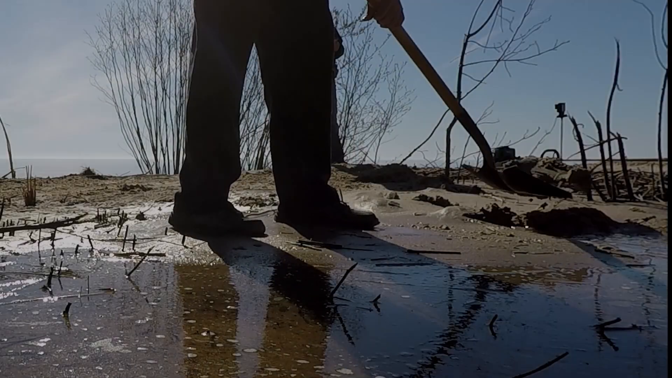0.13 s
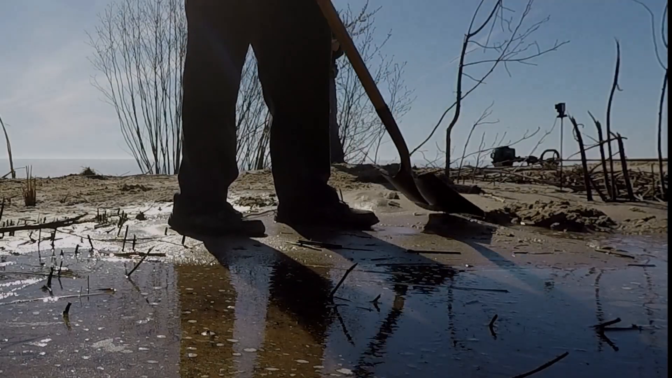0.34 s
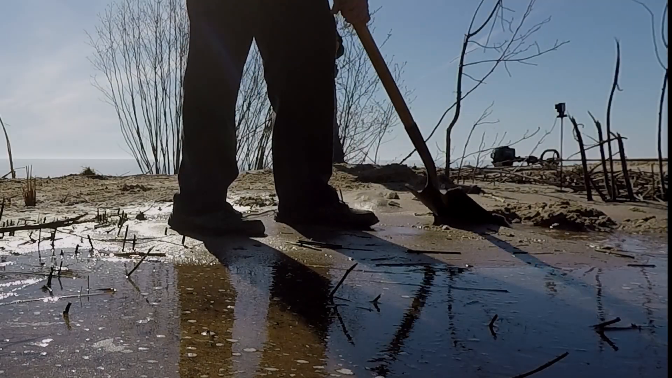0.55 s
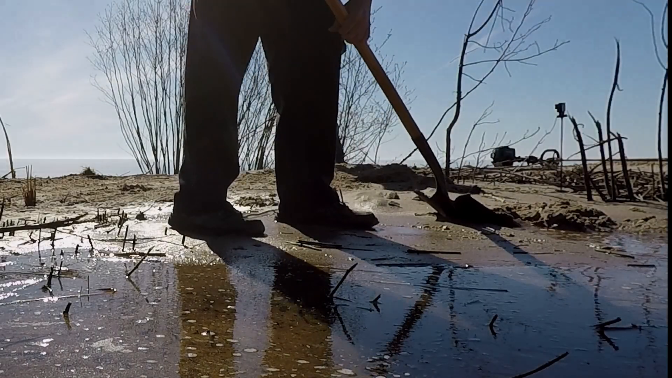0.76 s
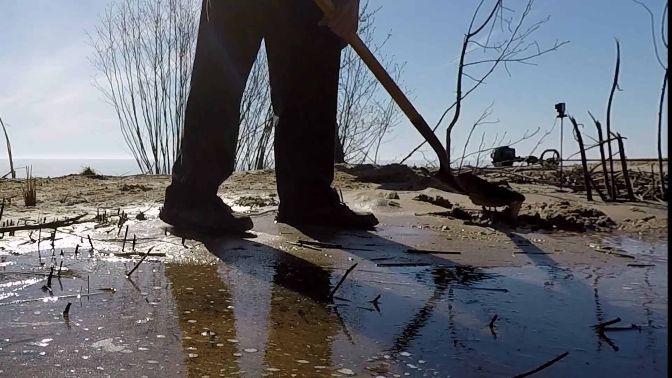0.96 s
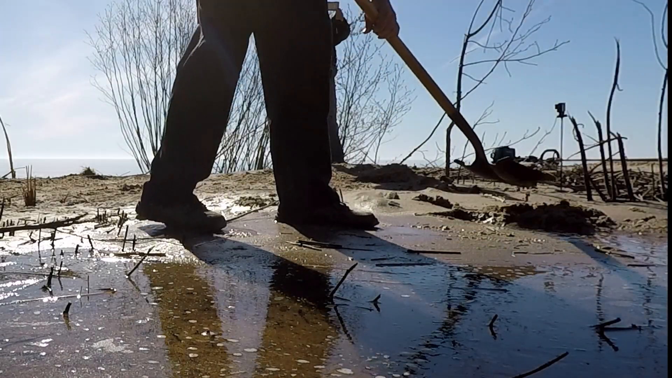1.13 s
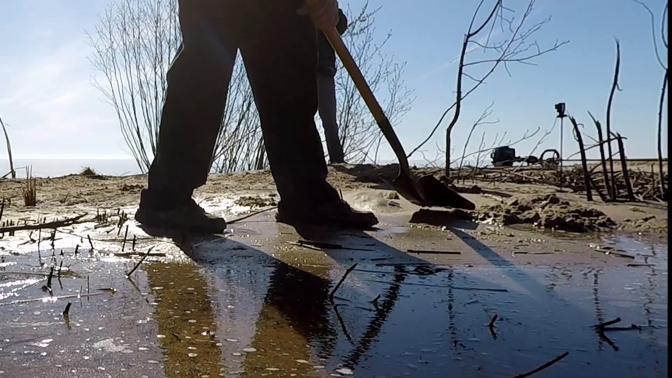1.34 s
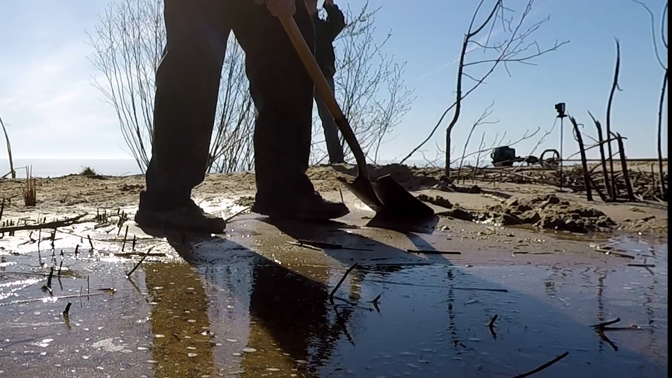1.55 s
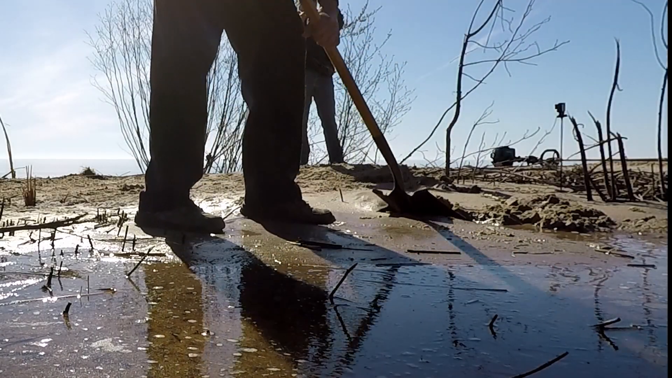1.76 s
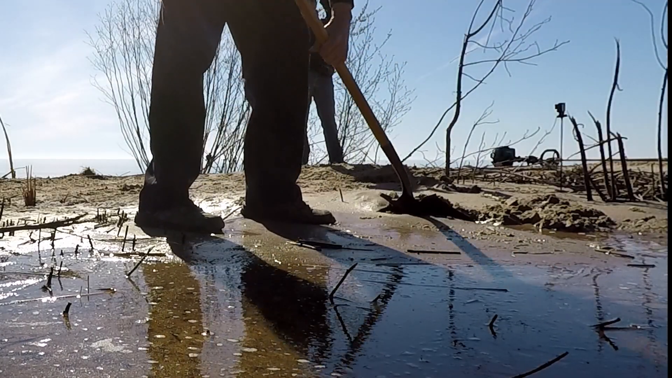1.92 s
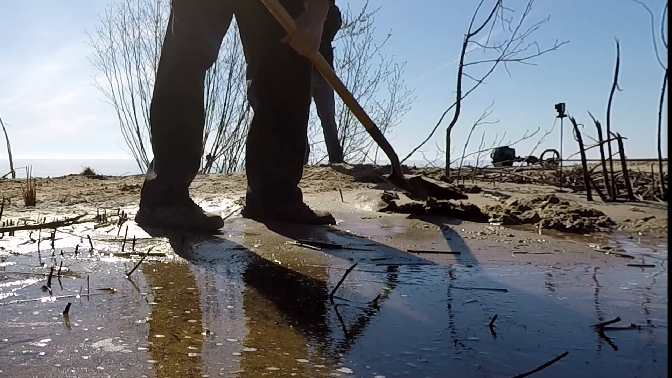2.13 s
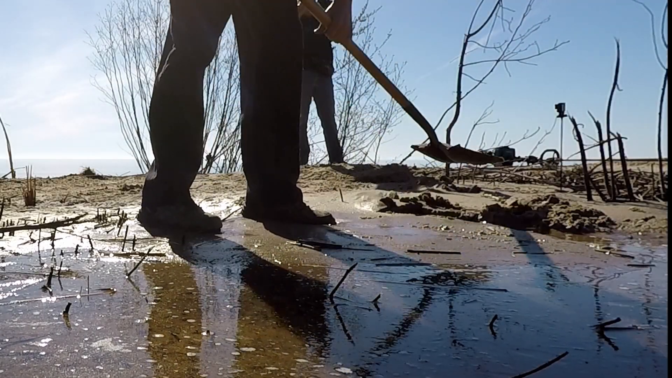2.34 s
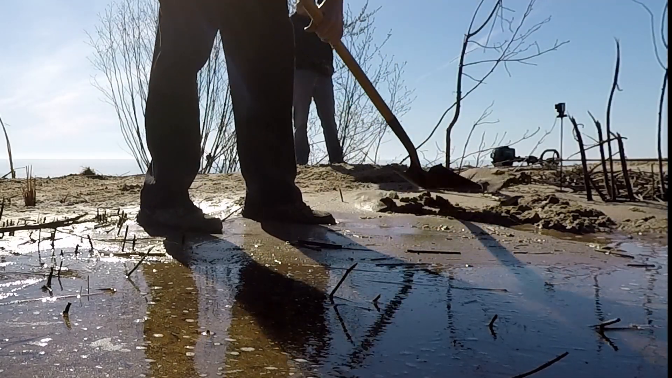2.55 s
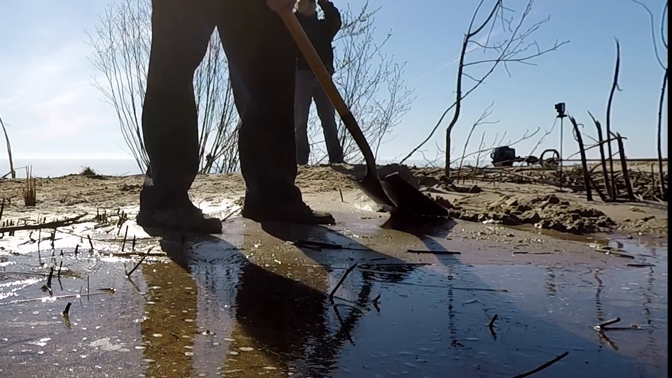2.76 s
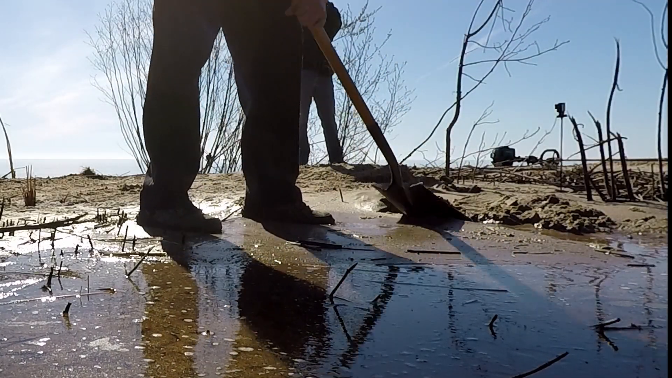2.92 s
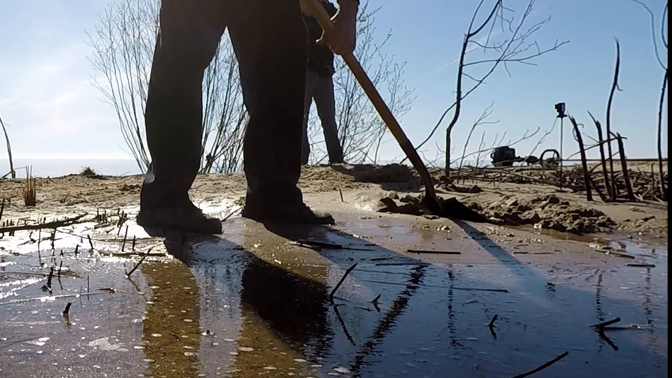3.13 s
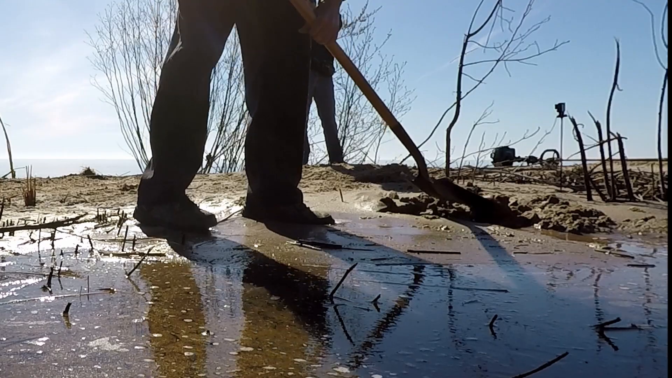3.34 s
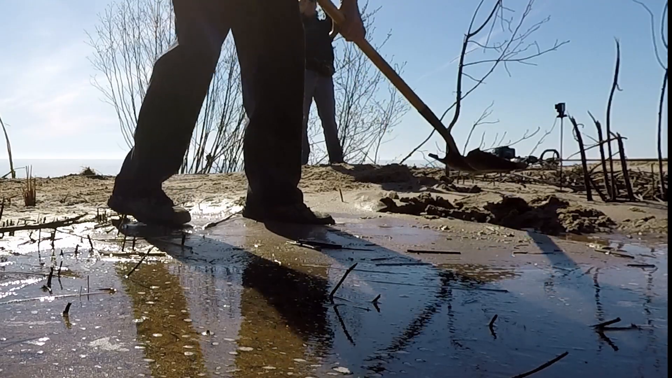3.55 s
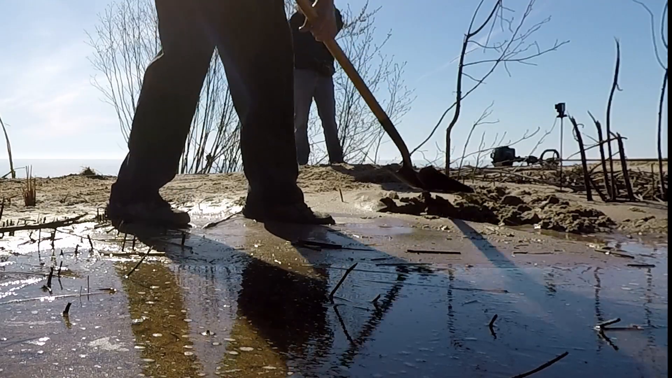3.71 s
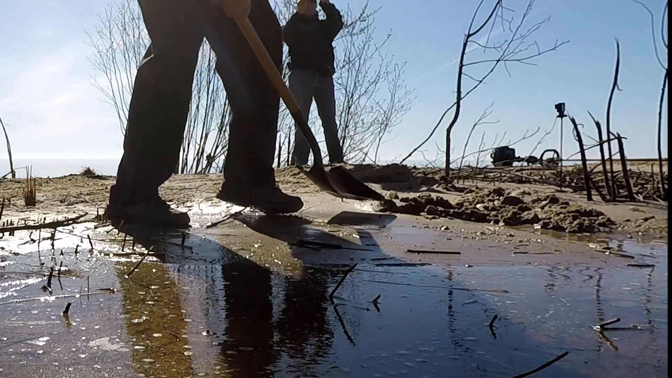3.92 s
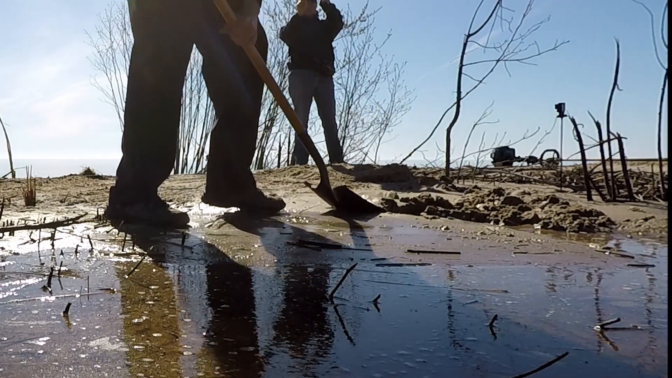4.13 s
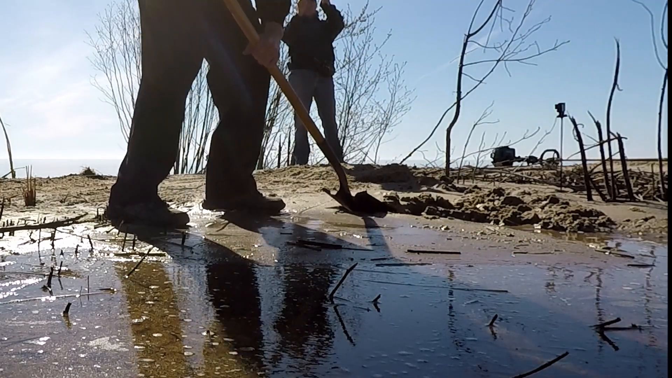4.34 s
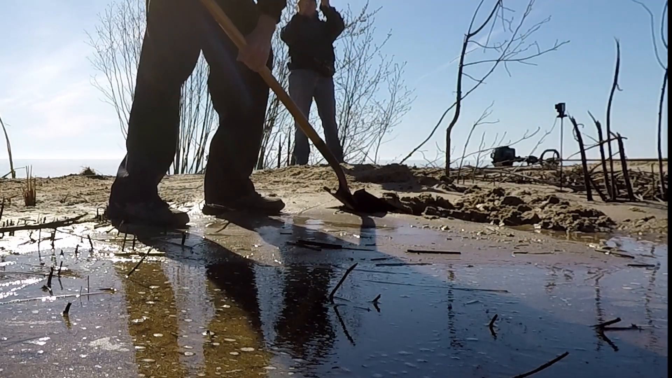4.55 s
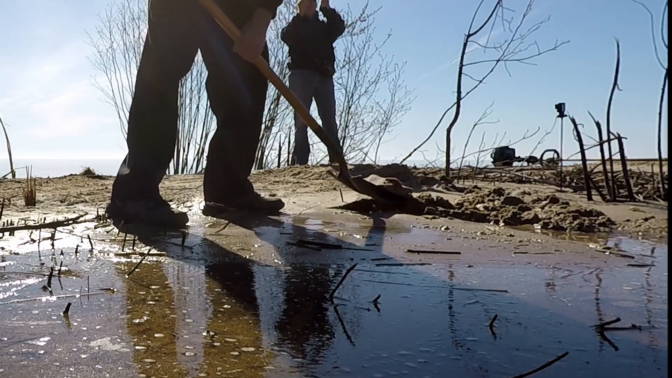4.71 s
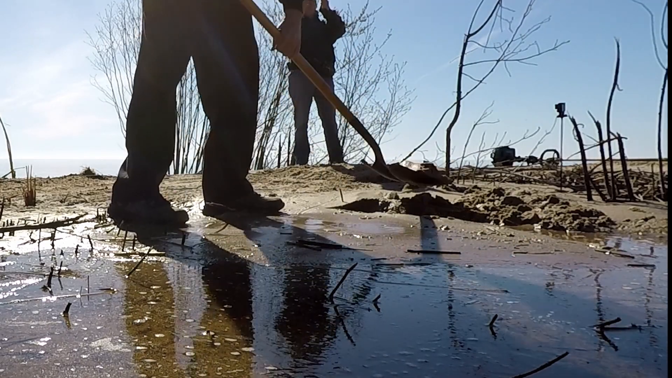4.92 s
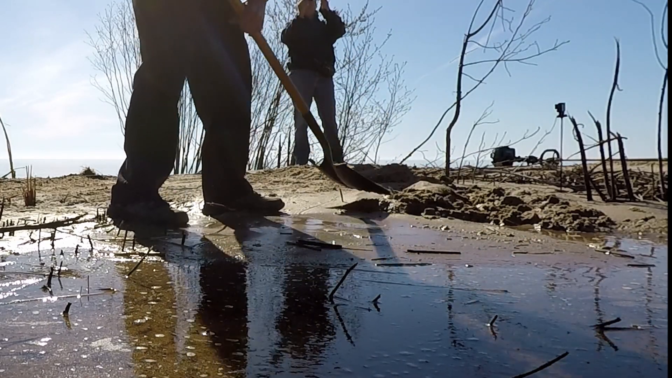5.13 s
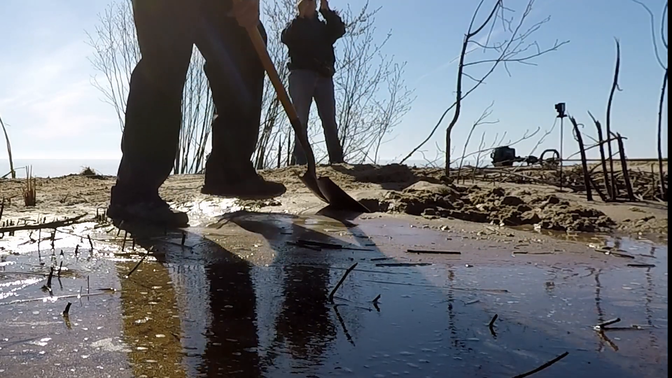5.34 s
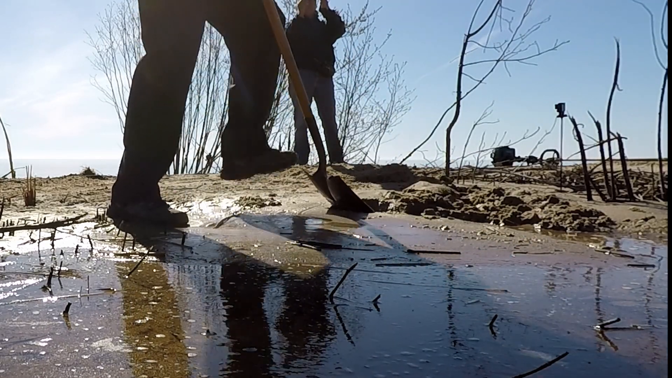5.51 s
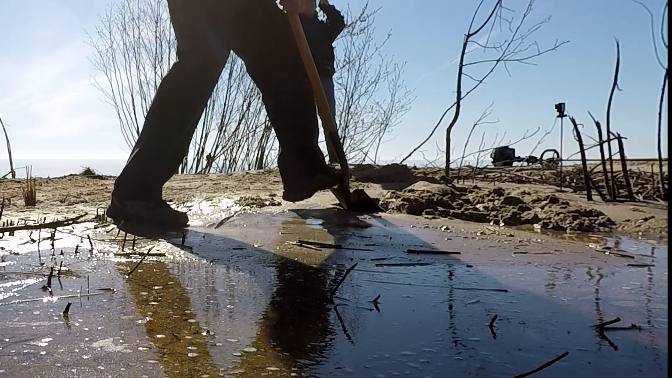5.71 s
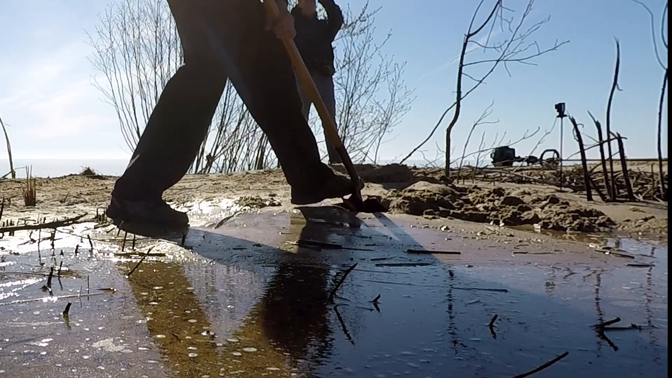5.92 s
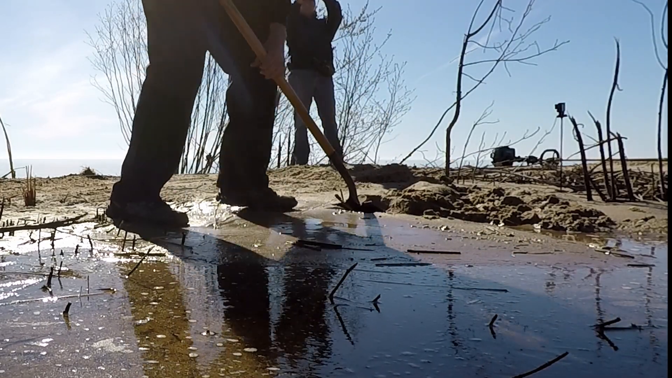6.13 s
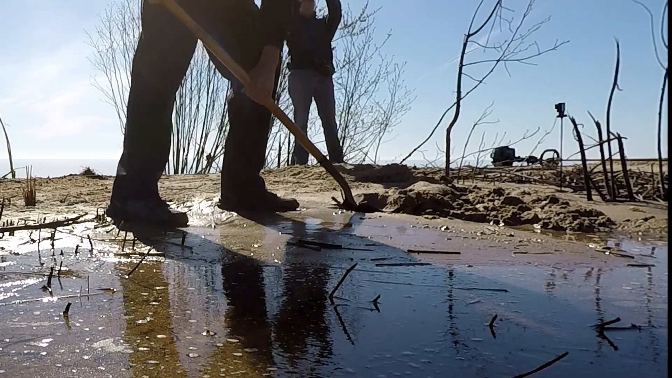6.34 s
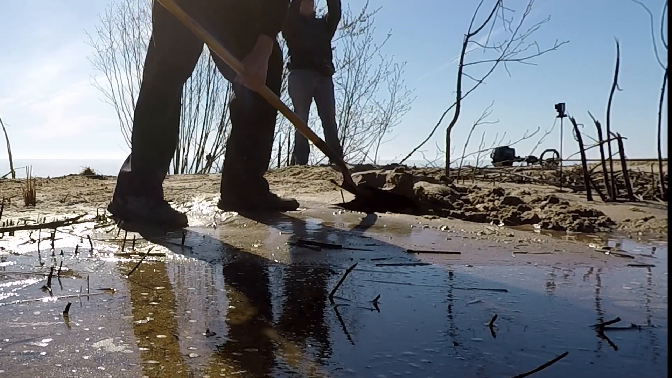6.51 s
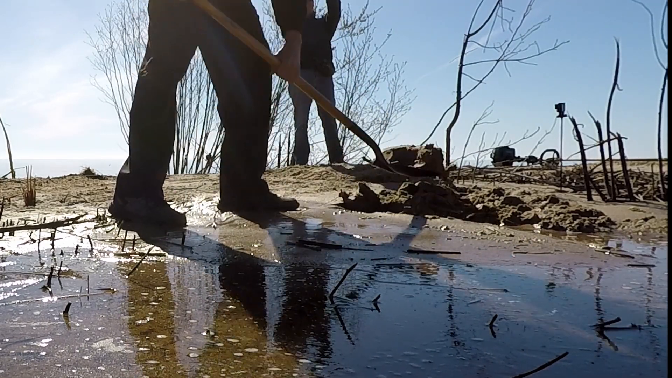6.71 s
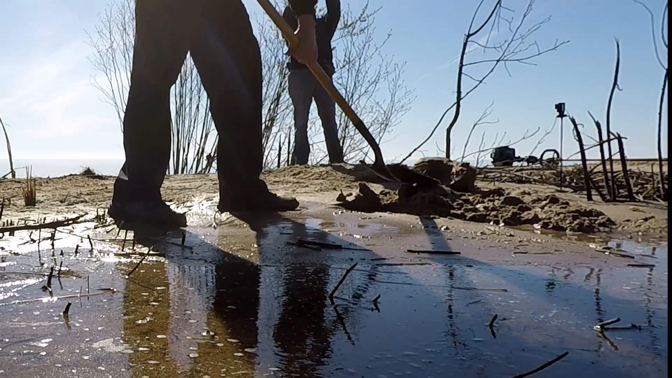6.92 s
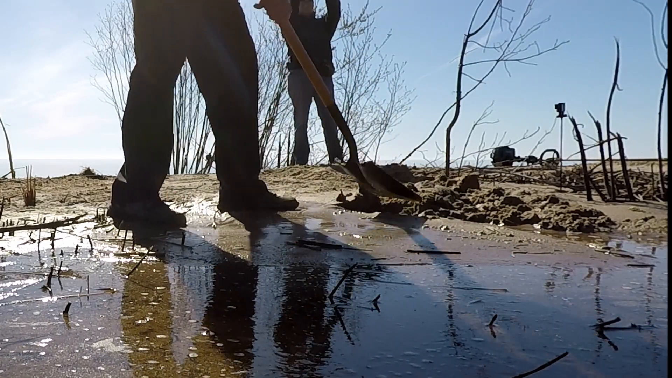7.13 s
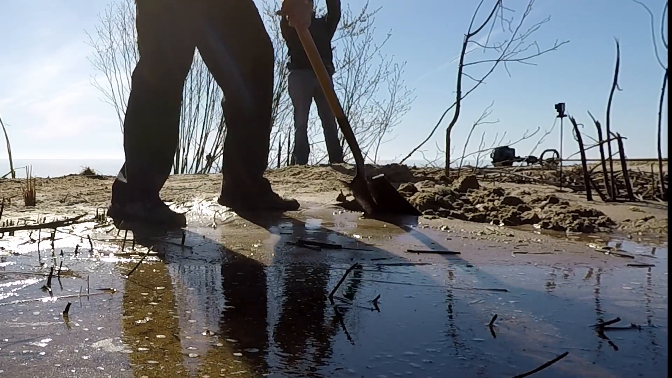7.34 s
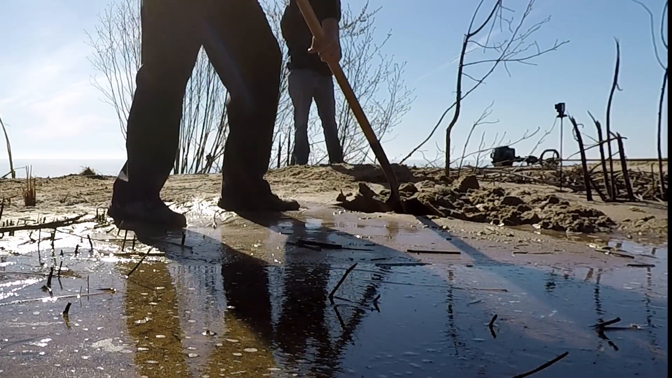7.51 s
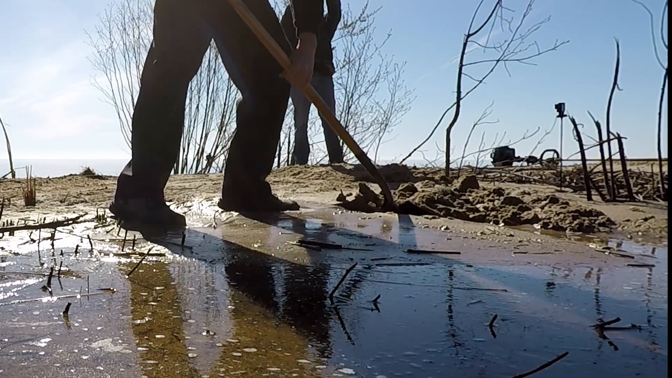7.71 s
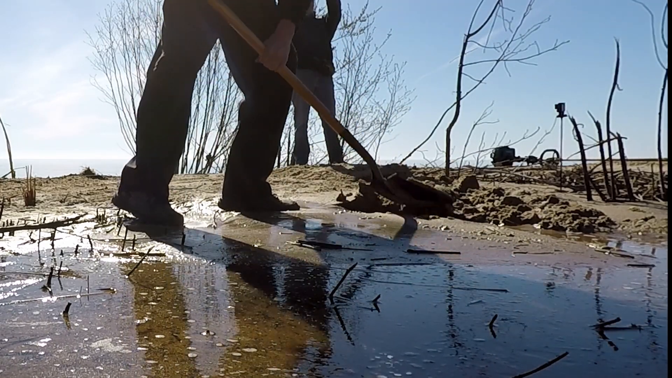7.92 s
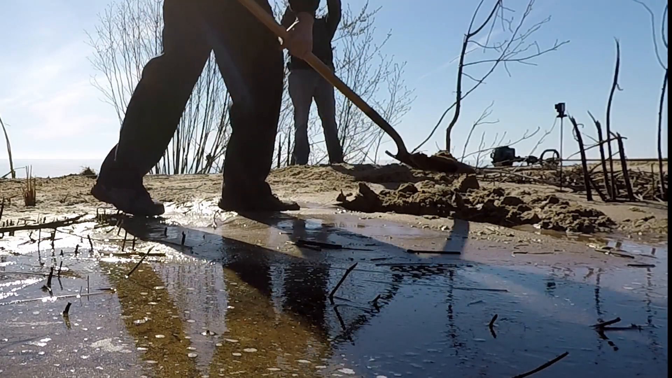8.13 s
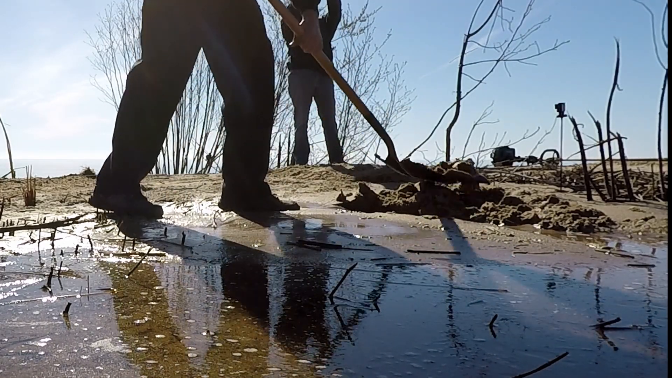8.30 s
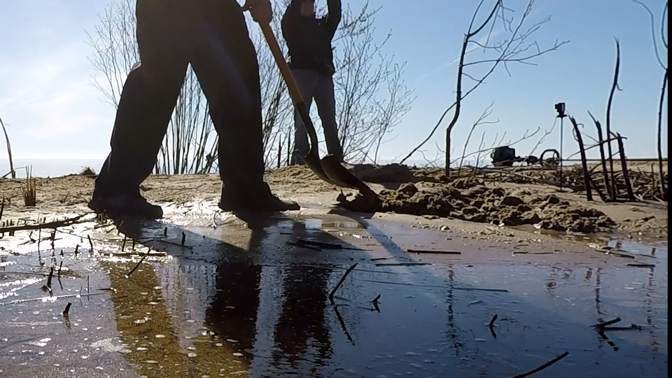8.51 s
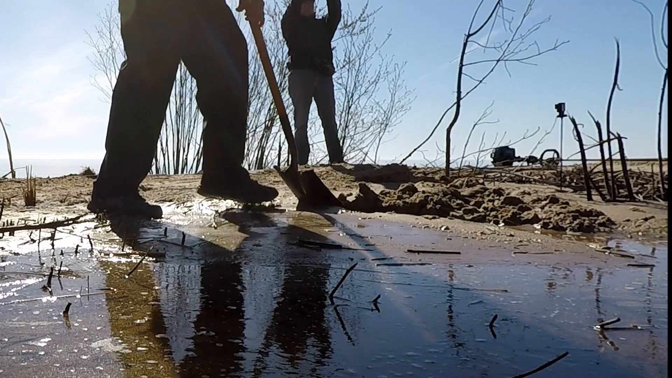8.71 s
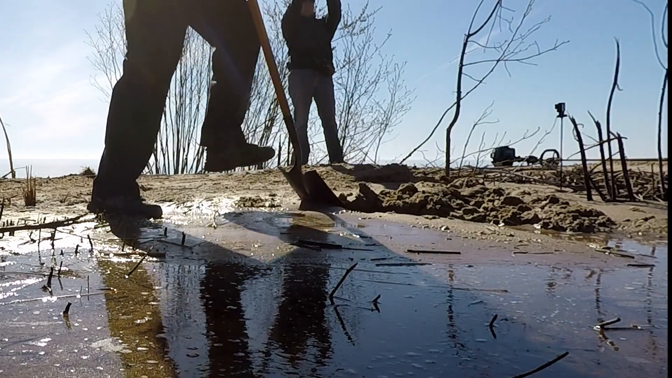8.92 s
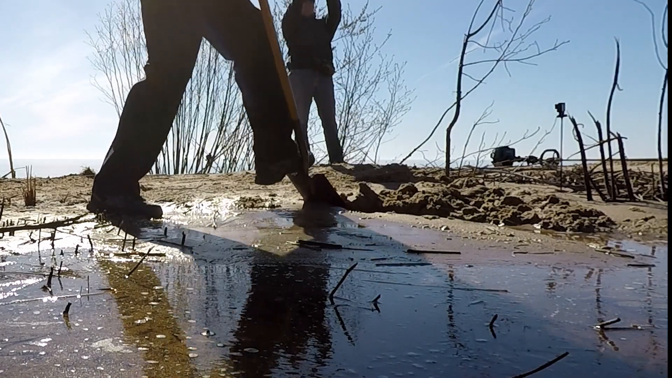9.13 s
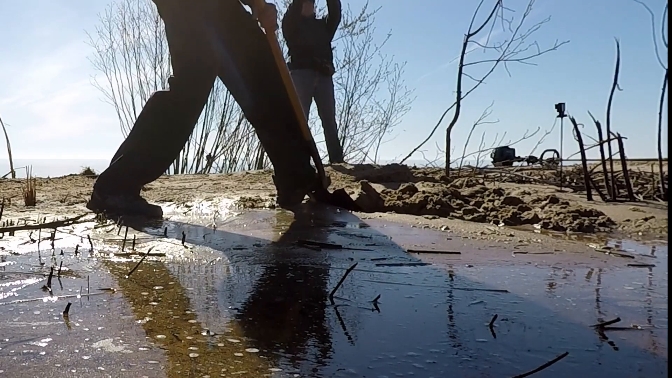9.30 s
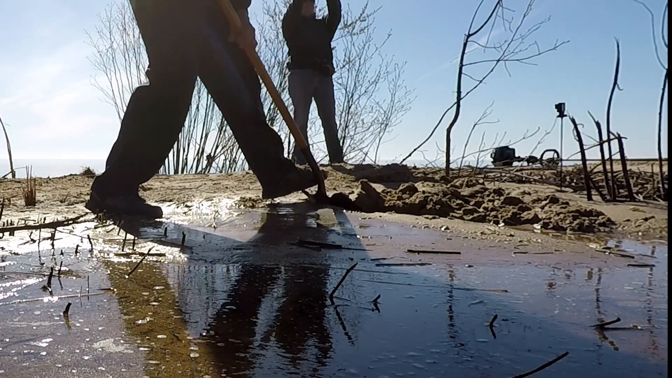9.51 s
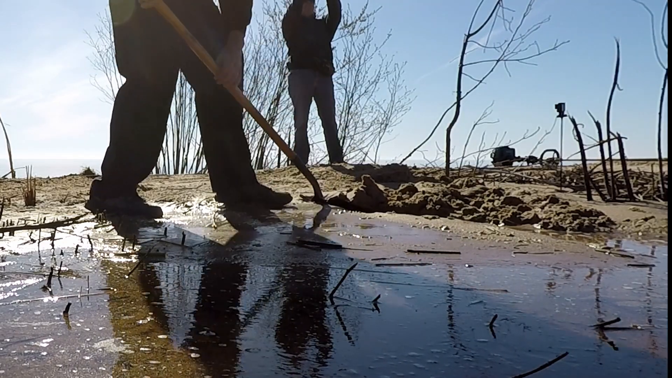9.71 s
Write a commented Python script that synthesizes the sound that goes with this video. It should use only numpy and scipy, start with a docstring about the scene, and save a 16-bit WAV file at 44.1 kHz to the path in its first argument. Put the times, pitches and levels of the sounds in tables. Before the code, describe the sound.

A shovel blade cuts wet sand in short rasping strokes, quick and vigorous early, lighter and more spaced later. Metallic ticks and crunchy bites mark contacts; sand slides off the steel and lumps land with small damped thumps. Fine bubbling hiss and trickling grains fill the gaps. Behind, an open shore washes softly and a distant engine throbs. Close-to-mid, dry outdoor perspective with little bass and softened top.

```python
"""A steel shovel cuts and scrapes through wet sand at the water's edge, a few metres from a small camera's microphone.
Random grain clicks, coloured by the steel, make long strokes, light drags, short bites and spatters.
Clods and boots land as damped falling tones, and wet sand fizzes as grainy filtered hiss.
Behind lie the wash of the open shore and a distant engine, low pulses over narrow wavering tones.
The stereo is narrow, with some width in the high treble; a wind filter cuts the bass and the top is cut too."""
import sys
import numpy as np
from scipy import signal
from scipy.fft import rfft, irfft
from scipy.io import wavfile
from scipy.ndimage import uniform_filter1d

SR = 44100
rng = np.random.default_rng(int(sys.argv[2]) if len(sys.argv) > 2 else 0)


def inscribe(sig):
    """Save sig as 16-bit PCM at rate SR to the path in sys.argv[1].

    A 1-D sig is mono; a 2-D sig holds one channel per row.
    Samples are clipped to [-1, 1] before scaling.
    """
    pcm = np.round(np.clip(np.atleast_2d(sig).T, -1, 1) * 32767)
    wavfile.write(sys.argv[1], SR, pcm.astype(np.int16))


N = 430416  # length in samples

# Open air with distant machinery, ahead of the wind filter. Each row: frequency in Hz, relative density in dB per Hz.
AIR_SPECTRUM = [(20, -13), (60, -20), (105, -10), (145, -0.5), (200, -6.5), (400, -18.5), (1070, -25),
                (1820, -25), (2830, -33.5), (4180, -30.5), (6350, -35), (9600, -38), (11400, -44.5),
                (13800, -46), (15500, -59)]
# Wavering tones of the distant engine, ahead of the wind filter. Each row: pitch in Hz, width in Hz, level in dB.
ENGINE_TONES = [(141.3, 4, -44.5), (246, 2.8, -54), (258.6, 10, -59.5)]
# Fizz of the wet sand over time. Each row: time in seconds, level in dB around which it wavers.
FIZZ_LEVELS = [(0.0, -52.5), (0.8, -51), (1.5, -53.5), (2.1, -50), (2.85, -52), (3.15, -50), (3.9, -54.5),
               (4.45, -50), (4.67, -54), (4.86, -67), (4.97, -45.5), (5.14, -52.5), (5.73, -50),
               (6.22, -52), (6.61, -60), (7.25, -60), (7.42, -52), (7.75, -49.5), (8.02, -56),
               (8.29, -50.5), (8.6, -63), (8.81, -51), (9.76, -51)]
# Colour of the fizz. Each row: frequency in Hz, relative density in dB per Hz.
FIZZ_SPECTRUM = [(6000, -27), (7800, -7), (9000, 0), (10200, -2), (11200, -9.5), (13000, -27)]
# Clods and boots landing. Each row: start in seconds, level in dB, starting pitch in Hz, 60 dB decay in seconds.
LANDINGS = [(1.495, -29, 900, 0.12), (1.574, -24, 1280, .08), (2.6255, -13, 850, 0.012),
            (2.642, -27, 750, 0.018), (2.765, -35, 870, 0.18), (3.743, -30.5, 433, 0.074),
            (5.168, -26.5, 266, 0.26), (5.982, -29.5, 740, .025), (6.983, -30, 740, 0.04),
            (6.996, -27.5, 396, 0.045)]
# Sand on steel. Each row: frequency in Hz, relative density in dB per Hz.
RASP_SPECTRUM = [(240, -51), (400, -6.5), (1260, -6), (1900, -5), (2180, -6.5), (3150, 3), (3460, 2.5),
                 (4150, -4.5), (4990, 5), (5900, -7), (11100, -18), (12500, -5.5), (15500, -39)]
# Ringing modes of the blade. Each row: frequency in Hz, width in Hz, relative level in dB around which it comes and goes.
BLADE_MODES = [(920, 110, -26.5), (1380, 180, -27.5), (1924, 410, -5), (2060, 280, -20), (2440, 210, -12),
               (2700, 100, -20.5), (3086, 55, -15.5), (3326, 47, -12.5), (3764, 150, -7), (3965, 71, -7),
               (4100, 600, -4), (4200, 89, -6.5), (4540, 83, -17.5), (5430, 150, -8), (5820, 290, -4),
               (6520, 72, -12.5), (11900, 490, -41), (13700, 510, -35)]
# Where a reflection cancels the blade's sound. Each row: centre in Hz, width in Hz, depth in dB.
REFLECTION_DIPS = [(3480, 155, -4), (5050, 200, -6), (6190, 110, -8)]
# Short bites, bumps and spatters. Each row: start in seconds, rasp level in dB, top relative to rasp in dB,
# contact in seconds, centre in Hz, focus on that centre from 0 to 1.
SHORT_BITES = [(0.209, -32.5, -16, 0.033, 4220, .24), (0.280, -30, -13, 0.033, 4460, 0.17),
               (0.384, -24, -19, 0.012, 3770, 0.06), (0.471, -16.5, -26, 0.0046, 3970, 0.8),
               (0.879, -35, -25, .004, 1800, .71), (1.119, -37, -30, .006, 2960, .67),
               (1.253, -36, -32, 0.022, 2530, .2), (1.385, -31.5, -13, 0.0051, 2370, .4),
               (1.412, -28, -13, 0.038, 4070, 0), (1.492, -18.5, -24, 0.03, 2300, 0),
               (1.57, -21.5, -37, 0.026, 1990, 0.06), (1.733, -19.5, -27, 0.0085, 1780, 0.3),
               (2.027, -24, -31, 0.0098, 1860, 0.46), (2.243, -39, -22, .007, 2570, 0.2),
               (2.579, -35, -12, .014, 3820, 0), (2.723, -31, -34, 0.0059, 4230, 0.9),
               (2.755, -18.5, -22, 0.047, 2900, 0), (2.841, -23.5, -20, 0.01, 4050, .2),
               (3.13, -34, -27, .006, 4260, .62), (3.203, -32, -27, 0.0036, 2400, 0),
               (3.242, -37.5, -24, 0.012, 2500, 0.05), (3.436, -33.5, -37, .021, 4150, .95),
               (3.742, -32, -21, 0.014, 3000, 0), (3.838, -35.5, -32, .01, 3990, .02),
               (3.848, -27.5, -30, .0049, 4230, 0.2), (4.059, -22.5, -11, 0.019, 5700, .1),
               (4.12, -19, -31, 0.0097, 3800, 0.4), (4.158, -18, -33, 0.0051, 3720, .9),
               (5.228, -25.5, -15, .02, 3970, 0), (5.709, -19.5, -30, 0.0047, 1700, 0.6),
               (5.974, -35.5, -25, 0.017, 5840, 0.1), (5.996, -35, -31, 0.02, 4550, .93),
               (6.106, -31, -16, .035, 2640, 0), (6.815, -42.5, -2.5, .035, 3500, 0),
               (6.899, -37.5, -2.5, .037, 4030, 0), (7.223, -30.5, -6.5, 0.025, 3300, .04),
               (8.107, -36, -7, 0.0094, 1700, .68), (8.123, -32.5, -22, .0047, 2210, .22),
               (8.338, -37, -9, 0.04, 2900, 0), (8.631, -27, -6.5, .021, 3270, 0),
               (9.485, -37.5, -20, .021, 1810, 0.1), (9.515, -34, -11, .006, 4500, .02),
               (9.54, -35.5, -32, 0.015, 4630, 1), (9.634, -37.5, -13, .046, 1760, .4)]
# Long strokes of the blade through the sand, one curve each. Each row of a curve: time in seconds, rasp level in dB.
STROKE_CURVES = [
    [(0.36, -55), (0.398, -34), (0.441, -32.5), (0.541, -24), (0.606, -28.5), (0.697, -38.5),
     (0.768, -47.5), (0.80, -70)],
    [(1.47, -44), (1.545, -30.5), (1.618, -25.5), (1.671, -21.5), (1.745, -28), (1.83, -28), (1.891, -37.5),
     (1.94, -60)],
    [(2.706, -53), (2.74, -35.5), (2.826, -34), (2.928, -26.5), (2.996, -25.5), (3.086, -30.5),
     (3.125, -47)],
    [(4.04, -57), (4.09, -31.5), (4.14, -23.5), (4.21, -28), (4.3, -31.5), (4.51, -42.5), (4.57, -58)],
    [(5.42, -49), (5.527, -40.5), (5.667, -33.5), (5.701, -27.5), (5.783, -27.5), (5.859, -34.5),
     (5.91, -57)],
    [(7.23, -54), (7.275, -34), (7.34, -30), (7.41, -24), (7.46, -28.5), (7.506, -28), (7.545, -43),
     (7.6, -72)],
    [(8.62, -55), (8.656, -37), (8.717, -33.5), (8.79, -37), (8.864, -48), (8.92, -53)],
    [(9.08, -52), (9.118, -34), (9.2, -30), (9.3, -34), (9.377, -37), (9.43, -64)],
]
# Tone of each stroke as it starts. Each row: dull body relative to rasp in dB, gritty top relative to rasp in dB,
# upper relative to lower rasp in dB.
STROKE_START_TONES = [(-22.5, -18, 6.5), (-21.5, -16.5, 4.5), (-18, -15.5, 5.5), (-25.5, -19, 6),
                      (-20.5, -12.5, 4), (-21.5, -15, 3), (-20, -13, 3), (-18.5, -12.5, 4)]
# Light drags and sand sliding off the blade. Each row: start in seconds, hold in seconds, swell and fade constant
# in seconds, rasp level in dB, top relative to rasp in dB, upper relative to lower rasp in dB.
LIGHT_DRAGS = [(0.209, 0.087, 0.023, -41.5, -16, -1), (0.79, 0.33, .03, -52, -18, -3),
               (1.202, .02, 0.038, -39, -10, 3), (1.387, 0.082, .015, -44.5, -11, -1),
               (2.007, 0.056, .04, -48, -17, 2), (2.272, 0.031, 0.049, -47.5, -12, 5),
               (2.444, 0.035, 0.033, -44.5, -10, 4), (2.606, 0.031, 0.016, -47, -24, -4),
               (3.117, 0.28, 0.044, -51, -16, -2), (3.565, 0.34, .03, -47.5, -11, 0),
               (4.603, 0.033, .025, -50, -26, -8), (4.987, 0.064, 0.023, -37, -12, 4),
               (5.322, 0.043, 0.043, -38.5, -17, 7), (5.95, 0.27, 0.032, -51.5, -18, 0),
               (6.42, 0.048, 0.049, -45, -7, 6), (6.948, 0.04, 0.042, -49, -15, -1),
               (7.696, 0.26, .03, -50.5, -15, 1), (8.22, 0.064, 0.033, -50, -13, 1),
               (8.36, 0.23, .02, -53, -22, -6), (8.888, 0.18, .02, -47, -26, -1),
               (9.468, 0.16, .02, -46.5, -15, 4), (9.655, .025, 0.024, -43, -22, -1)]

AIR_DB = -38.5  # ahead of its swells and the wind filter
THROB_HZ, THROB_START_S = 9.759, 0.0525
# A contact that rings higher is brighter and has less body; levels are for a centre at BITE_MID_HZ.
BITE_MID_HZ = 2800
BITE_BODY_DB, BODY_DB_PER_OCTAVE = -16, -5.5
BITE_UPPER_DB, UPPER_DB_PER_OCTAVE = -0.1, 5.5
# The deeper the blade sinks, the duller the stroke.
BODY_DB_PER_S, TOP_DB_PER_S, UPPER_DB_PER_S = 10.5, -16.5, -6.5
DRAG_BODY_DB = -16  # relative to rasp
# Loose sand keeps trickling: rasp level, then body and top relative to rasp, and upper relative to lower rasp.
TRICKLE_DB, TRICKLE_BODY_DB, TRICKLE_TOP_DB, TRICKLE_UPPER_DB = -61, 4, -9.5, -11
WIDE_ABOVE_HZ, WIDE_SIDE_DB = 11600, -3  # side level relative to mid, before a further treble cut
WIND_CUT_HZ, WIND_LEAK_DB, TOP_HZ = 133.7, -23.5, 15150


def undb(db):
    """Turn decibels into an amplitude factor."""
    return 10 ** (np.asarray(db) / 20)


def level(x, db):
    """Scale a signal to an RMS level in dB."""
    return x * undb(db) / np.sqrt(np.mean(x ** 2))


def hz_axis():
    """Frequencies of the whole-length spectrum, at least 1 Hz."""
    return np.maximum(np.arange(N // 2 + 1) * SR / N, 1)


def spectrum_gain(points):
    """Gain through (Hz, dB) points, joined along log frequency."""
    hz, db = np.transpose(points)
    return undb(np.interp(np.log(hz_axis()), np.log(hz), db))


def colour(x, gain):
    """Filter a whole-length signal by a gain over frequency."""
    return irfft(rfft(x) * gain, N)


def above(hz, steep=12.7):
    """Smooth step in gain from 0 below hz to 1 above."""
    return 1 / (1 + (hz / hz_axis()) ** steep)


def ring(x, hz, width):
    """A resonance of the given centre and width in Hz, excited by x."""
    return signal.lfilter(*signal.iirpeak(hz, hz / width, fs=SR), x)


def walk(rate):
    """Random values held 1 / rate seconds and smoothed twice; spread near 1."""
    hold = int(SR / rate)
    steps = np.repeat(rng.standard_normal(N // hold + 1), hold)
    smooth = uniform_filter1d(uniform_filter1d(steps, hold), hold)
    return 0.87 * smooth[:N]


def add(out, s, piece):
    """Mix a piece in at s seconds, cut at the end of the scene."""
    i = int(s * SR)
    out[i:i + len(piece)] += piece[:N - i]


def air():
    """Wash and rumble of the open shore: coloured noise whose low and upper parts swell on their own."""
    wash = level(colour(rng.standard_normal(N), spectrum_gain(AIR_SPECTRUM)), AIR_DB)
    upper = colour(wash, above(750, steep=3.4))
    rumble = wash - upper
    return rumble * undb(0.12 * walk(2.96)) + upper * undb(walk(3.13))


def engine():
    """One soft low pulse a firing, steady in time and uneven in size, over narrow wavering tones."""
    out = np.zeros(N)
    t = np.arange(-800, 800) / SR
    # a narrow and a wide pulse, each swinging up and then down
    snap, heave = (-t / w * np.exp(-(t / w) ** 2 / 2) for w in (0.0009, 0.0032))
    for s in np.arange(THROB_START_S, N / SR, 1 / THROB_HZ):
        snap_chance, heave_chance = rng.standard_normal(2)
        pulse = snap * undb(-31.0 + 3.1 * snap_chance) + heave * undb(-30.5 + 3.1 * heave_chance)
        add(out, s - 800 / SR + 0.00323, pulse)
    for hz, width, db in ENGINE_TONES:
        out += level(ring(rng.standard_normal(N), hz, width), db)
    return out


def grains(scatter_db):
    """A dense stream of clicks; some are larger than the rest."""
    size_db = scatter_db * np.minimum(rng.exponential(size=N), 4)
    return level(rng.standard_normal(N) * undb(size_db), 0)


def fizz():
    """Tiny bubbles burst in the soaked sand: grainy treble hiss."""
    hiss = level(colour(grains(scatter_db=4.0), spectrum_gain(FIZZ_SPECTRUM)), 0)
    s, db = np.transpose(FIZZ_LEVELS)
    return hiss * undb(np.interp(np.arange(N) / SR, s, db) + 1.2 * walk(12))


def thuds():
    """A lump of wet sand or a boot lands: a damped ring that sinks in pitch, with loose noise around it."""
    out = np.zeros(N)
    t = np.arange(int(0.2 * SR)) / SR
    for s, db, hz, t60 in LANDINGS:
        tone = np.sqrt(2) * np.sin(2 * np.pi * hz * t * (1 - 1.47 * t))
        noise = ring(ring(rng.standard_normal(len(t)), hz, hz / 1.8), hz, hz / 1.8)
        lump = 0.51 * tone + 0.79 * level(noise, 0)
        swell = np.minimum(t / (0.1 * t60), 1)
        add(out, s, lump * swell * undb(db - 60 * t / t60))
    return out


def steel(x):
    """Body, lower rasp, upper rasp and top of the grains as the blade radiates them, each of unit level."""
    both = level(colour(x, spectrum_gain(RASP_SPECTRUM)), 0.3)
    # the sand damps now one part of the blade, now another, so each mode comes and goes
    for hz, width, db in BLADE_MODES:
        both += level(ring(x, hz, width), db) * undb(2.5 * walk(25))
    dips = undb(sum(db / (1 + (2 * (hz_axis() - hz) / width) ** 2) for hz, width, db in REFLECTION_DIPS))
    low, middle, high = above(1480), above(3040), above(7400)
    ranges = 1 - low, low * (1 - middle), middle * (1 - high), high
    return np.array([level(colour(both, dips * gain), 0) for gain in ranges])


def blend(bands, body_db, top_db, upper_db):
    """Rasp of unit level tilted between its halves, and the body and top around it."""
    body, lower, upper, top = bands
    rasp = (lower + undb(upper_db) * upper) / np.sqrt(1 + undb(2 * upper_db))
    return rasp, undb(body_db) * body + undb(top_db) * top


def bites():
    """Grains crushed while the contact lasts: fast swell, sagging hold, quick release."""
    out = np.zeros(N)
    bands = steel(grains(scatter_db=1.5) * undb(0.31 * walk(300)))
    # spattering sand is strongest at the lower end of the top range
    bands[3] = level(colour(bands[3], 1 - 0.96 * above(13500)), 0)
    t = np.arange(int(0.12 * SR)) / SR
    for s, db, top_db, contact, hz, focus in SHORT_BITES:
        u = t / contact
        swell = np.tanh(t / (0.001 + 0.16 * contact))
        shape = swell * np.exp(-0.3 * u) / (1 + u ** 5)
        octaves = np.log2(hz / BITE_MID_HZ)
        body_db = BITE_BODY_DB + BODY_DB_PER_OCTAVE * octaves
        upper_db = BITE_UPPER_DB + UPPER_DB_PER_OCTAVE * octaves
        i = int(s * SR)
        rasp, rest = blend(bands[:, i:i + len(t)], body_db, top_db, upper_db)
        # each contact favours the part of the blade that it touches
        near = level(ring(ring(rasp, hz, hz / 3.7), hz, hz / 3.7), 0)
        add(out, s, shape * undb(db) * ((1 - focus) * rasp + np.sqrt(focus) * near + rest))
    return out


def strokes(bands):
    """The blade pushes through the sand: each stroke follows its level curve and dulls as the blade sinks."""
    out = np.zeros(N)
    for stroke, (body_db, top_db, upper_db) in zip(STROKE_CURVES, STROKE_START_TONES):
        s, db = np.transpose(stroke)
        t = np.arange(int((s[-1] - s[0]) * SR)) / SR
        i = int(s[0] * SR)
        rasp, rest = blend(bands[:, i:i + len(t)], body_db + BODY_DB_PER_S * t,
                           top_db + TOP_DB_PER_S * t, upper_db + UPPER_DB_PER_S * t)
        add(out, s[0], undb(np.interp(s[0] + t, s, db)) * (rasp + rest))
    return out


def drags(bands):
    """Light drags and sand sliding off the blade: exponential swell, hold and exponential fade."""
    out = np.zeros(N)
    time = np.arange(N) / SR
    for s, hold, fade, db, top_db, upper_db in LIGHT_DRAGS:
        shape = np.exp(np.minimum((time - s) / fade, 0) - np.maximum((time - s - hold) / fade, 0))
        on = shape > 0.01
        rasp, rest = blend(bands[:, on], DRAG_BODY_DB, top_db, upper_db)
        out[on] += shape[on] * undb(db) * (rasp + rest)
    return out


def trickle(bands):
    """Loose sand keeps trickling: the same grains, faint and dull, at a wavering level."""
    rasp, rest = blend(bands, TRICKLE_BODY_DB, TRICKLE_TOP_DB, TRICKLE_UPPER_DB)
    return undb(TRICKLE_DB + 1.5 * walk(9.1)) * (rasp + rest)


def slide():
    """The blade sticks and slips, so the grains come in uneven surges, partly its own in each range."""
    surge = undb(0.7 * walk(45) + 1.4 * walk(160))
    bands = steel(grains(scatter_db=1.5) * surge)
    bands *= undb([1.36 * walk(70) for _ in range(4)])
    return trickle(bands) + drags(bands) + strokes(bands)


def scene():
    """Mix all sources, then widen the high treble in stereo."""
    mid = air() + engine() + fizz() + thuds() + bites() + slide()
    # the high treble is spread by random phases
    scatter = np.exp(2j * np.pi * 0.06 * np.cumsum(rng.standard_normal(N // 2 + 1)))
    width = above(WIDE_ABOVE_HZ, steep=52.0) * (1 - 0.36 * above(8900))
    side = colour(mid, undb(WIDE_SIDE_DB) * width * scatter)
    return np.array([mid + side, mid - side])


def record(dry):
    """A steep wind filter leaves a trace of the bass; a steep low-pass cuts the top."""
    keep = above(WIND_CUT_HZ, steep=74.0)
    cut = colour(dry, keep + undb(WIND_LEAK_DB) * (1 - keep))
    top_cut = signal.ellip(10, 0.2, 80, TOP_HZ, fs=SR, output="sos")  # 0.2 dB ripple, 80 dB stop band
    return signal.sosfilt(top_cut, cut)


dry = scene()
out = record(dry)
inscribe(out)
```